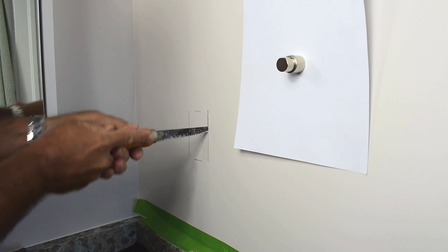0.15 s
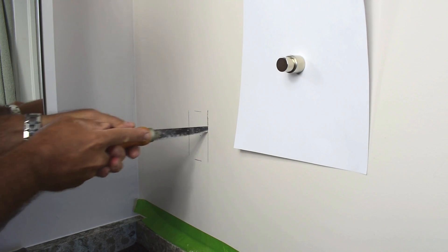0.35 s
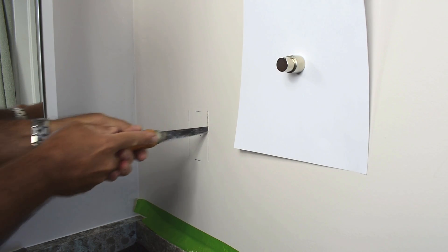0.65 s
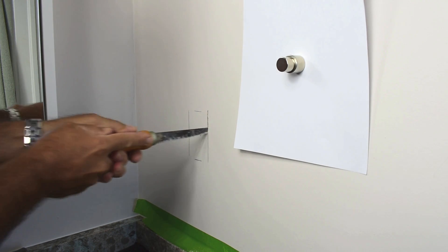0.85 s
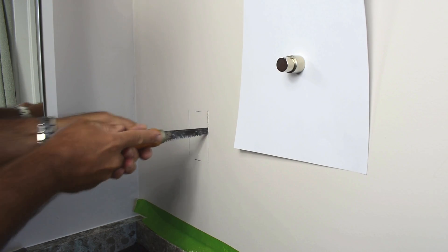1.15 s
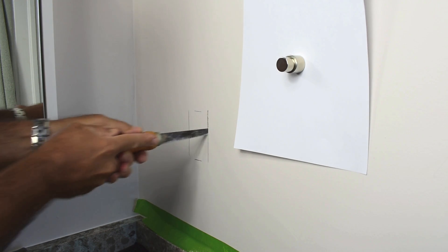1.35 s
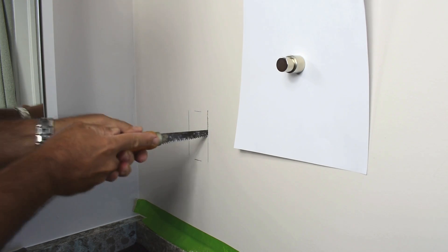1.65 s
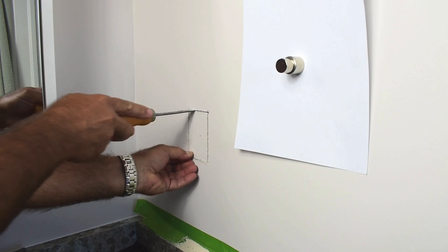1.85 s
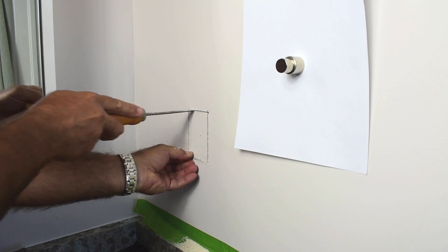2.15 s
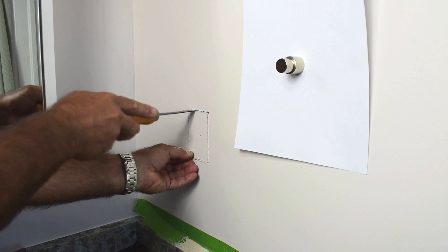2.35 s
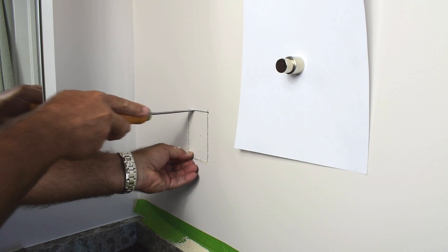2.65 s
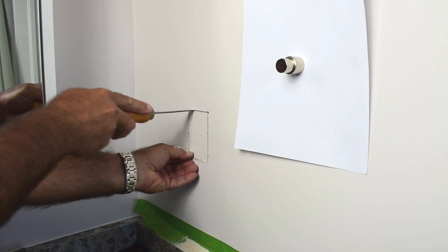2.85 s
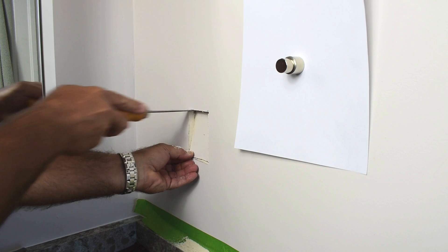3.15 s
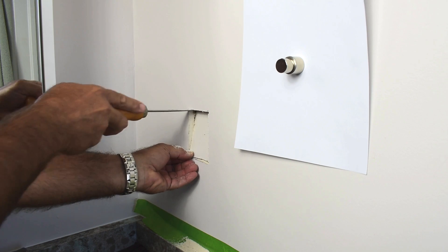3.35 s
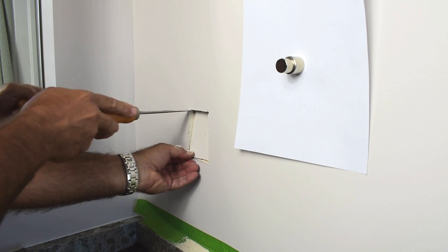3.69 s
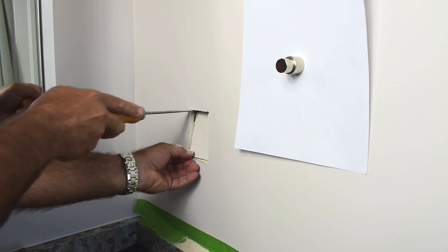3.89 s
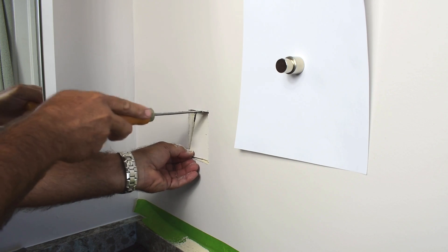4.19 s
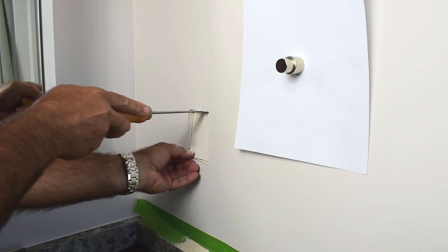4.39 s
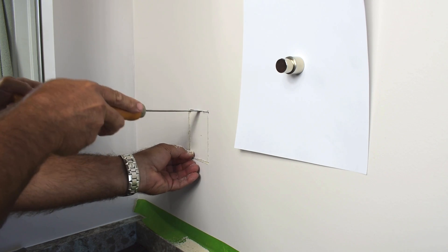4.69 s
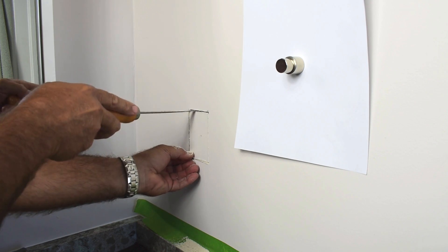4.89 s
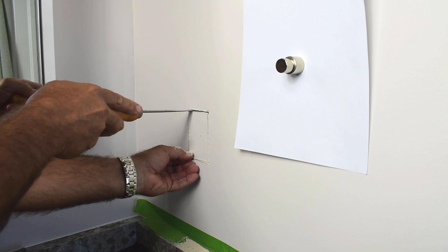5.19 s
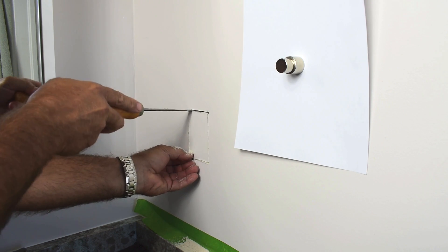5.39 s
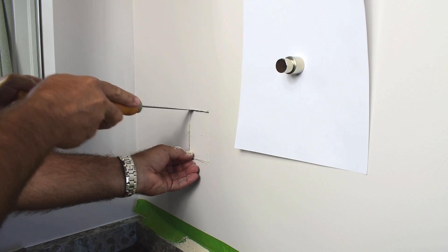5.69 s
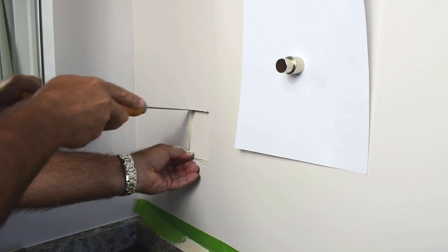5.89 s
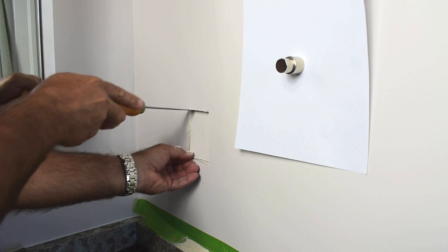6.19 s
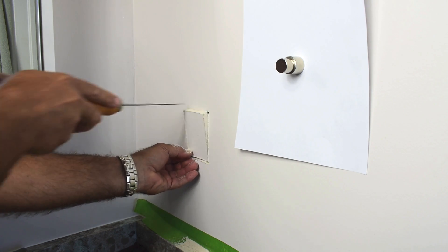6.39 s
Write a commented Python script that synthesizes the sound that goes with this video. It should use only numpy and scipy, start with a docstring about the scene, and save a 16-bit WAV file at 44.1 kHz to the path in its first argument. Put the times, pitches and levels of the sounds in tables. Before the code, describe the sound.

In a quiet room, quick, loud strokes of a hand saw tear through plasterboard close by. Each gritty rasp comes with a hollow thud from the wall, and the teeth snag now and then. After a few seconds the sawing eases, the blade squeaks once and a faint hum swells and fades. A few softer scraping strokes follow to the end.

```python
"""Sawing a hole in plasterboard

A hand saw cuts a small opening in a plasterboard wall, close by, about eight strokes a second.
Each tooth that bites thumps the hollow wall. Torn gypsum (the chalky filling) rasps and makes the
blade ring; now and then a tooth snags or grit snaps. After two hard cuts the strokes turn light,
the blade squeaks, and a low hum swells and fades in the quiet room."""
import sys
import numpy as np
from scipy import signal
from scipy.fft import rfft, irfft
from scipy.io import wavfile
from scipy.ndimage import uniform_filter1d

SR = 44100
rng = np.random.default_rng(int(sys.argv[2]) if len(sys.argv) > 2 else 0)


def master(y):
    """Save y as 16-bit WAV."""
    cut = np.clip(np.atleast_2d(y).T, -1, 1)
    pcm = np.round(cut * 32767)  # scale
    wavfile.write(sys.argv[1], SR, pcm.astype(np.int16))


N = 288414

# Levels in the tables are relative: the functions scale them further.
# Saw strokes: start t/s, length/s, attack/s, deepest bite after the start/s, thump after the start/s,
# rasp level/dB, boom level/dB, knock level/dB, extra dust hiss/dB
STROKES = [(0.0, 0.0096, 0.005, 0.0, 0.0079, -35.5, -6, -20, 5),
           (0.031, 0.053, 0.006, 0.027, 0.029, -28, -6, -15, 3.5),
           (0.141, 0.06, 0.042, 0.013, 0.033, -35, -5.5, -18.5, 2.5),
           (0.238, 0.041, 0.0083, 0, 0.0059, -36.5, -15, -20, 4.5),
           (0.364, 0.037, 0.0096, 0.0096, 0.027, -39, -25, -31, 4.5),
           (0.489, 0.079, 0.058, 0.047, 0.037, -41, -15, -24, 4.5),
           (0.592, 0.092, 0.021, 0.048, 0.045, -36.5, -18, -31, 8.5),
           (0.729, 0.071, 0.007, 0.032, 0.035, -27.5, -7.5, -12.5, 3),
           (0.849, 0.054, 0.055, 0.029, 0.04, -35.5, -9.5, -23.5, 2.5),
           (0.946, 0.016, 0.013, 0, 0.034, -37, -16.8, -21.5, 3.5),
           (0.998, 0.048, 0.005, 0.0067, 0.021, -33, -10.5, -22, 3),
           (1.082, 0.05, 0.05, 0.0047, 0.04, -38.5, -16, -30.5, 6),
           (1.19, 0.071, 0.015, 0.052, 0.046, -28, -6, -15, -0.5),
           (1.307, 0.077, 0.029, 0.04, 0.045, -33.0, -13, -25, 7),
           (1.437, 0.075, 0.042, 0.04, 0.024, -28.5, -8.5, -13.5, 3.0),
           (1.554, 0.05, 0.019, 0.0076, 0.009, -32.5, -7, -19.5, 5.5),
           (1.649, 0.01, 0.028, 0.0017, 0.0098, -37.5, -14, -19, 4),
           (1.691, 0.04, 0.004, 0.028, 0.018, -27, -8, -14, 6),
           (1.777, 0.039, 0.05, 0.016, 0, -35.5, -17.5, -23.5, 2),
           (1.864, 0.04, 0.0073, 0.014, 0.029, -33, -7, -16, 2.5),
           (1.98, 0.086, 0.005, 0.043, 0.066, -33, -11.5, -25, 5),
           (2.111, 0.038, 0.027, 0.028, 0.034, -36, -8, -14.5, 4),
           (2.247, 0.06, 0.009, 0.02, 0.047, -38.5, -20, -29.5, 4.5),
           (2.361, 0.081, 0.011, 0.058, 0.034, -26.5, -9.5, -14, 2.9),
           (2.496, 0.059, 0.028, 0.027, 0.024, -30.5, -11.5, -23.5, 4),
           (2.602, 0.093, 0.011, 0.05, 0.042, -25.9, -5.5, -10.5, 1),
           (2.746, 0.074, 0.047, 0.026, 0.031, -31, -13.5, -18.5, 5),
           (2.869, 0.067, 0.014, 0.028, 0.041, -24.5, -8, -16.3, 2),
           (2.971, 0.1, 0.05, 0.05, 0.015, -32.5, -22.5, -24, 4.5),
           (3.12, 0.048, 0.0073, 0.024, 0.034, -26, -6, -11.5, 3.5),
           (3.239, 0.057, 0.0054, 0.013, 0.065, -28.5, -13.5, -22, 6),
           (3.343, 0.081, 0.039, 0.035, 0.068, -34.5, -15.6, -28, 0.5),
           (3.495, 0.066, 0.046, 0.018, 0.018, -42.5, -31.7, -42, 8.5),
           (3.594, 0.06, 0.038, 0.053, 0.056, -39, -34, -40.5, 3.5),
           (3.699, 0.076, 0.018, 0.0073, 0.029, -38.5, -30.5, -39, 5.5),
           (3.814, 0.037, 0.013, 0.013, 0.025, -39.5, -46, -41, 1.9),
           (3.878, 0.04, 0.05, 0.0059, 0.019, -39.5, -37.5, -44, 4.5),
           (3.957, 0.047, 0.02, 0, 0.056, -40, -40.5, -47, 6),
           (4.176, 0.079, 0.019, 0.045, 0.024, -49, -41.5, -54, 7),
           (4.3, 0.047, 0.004, 0.015, 0.017, -42, -32.5, -44.5, 2.5),
           (4.43, 0.048, 0.03, 0.026, 0.0, -41.5, -37.5, -47, 1),
           (4.547, 0.15, 0.05, 0.058, 0.05, -50.5, -38, -46.7, 7.6),
           (4.755, 0.063, 0.044, 0.037, 0.036, -55.5, -44, -54, 9),
           (4.874, 0.025, 0.026, 0.0047, 0.04, -58.5, -52.4, -55, 5),
           (5.024, 0.026, 0.0061, 0, 0.042, -55.5, -62, -61, 12),
           (5.228, 0.023, 0.0071, 0, 0.048, -55, -32.5, -52, 2),
           (5.27, 0.092, 0.0045, 0.011, 0, -42, -31, -42, 11),
           (5.383, 0.046, 0.024, 0.014, 0.023, -40.5, -38, -41.5, 3),
           (5.484, 0.022, 0.011, 0, 0.033, -39, -25, -38.5, 4.7),
           (5.608, 0.033, 0.0038, 0.026, 0.0056, -37.5, -37, -37.5, 3.5),
           (5.697, 0.023, 0.05, 0, 0.002, -43.6, -32.5, -40.5, 7),
           (5.821, 0.028, 0.008, 0.0021, 0.008, -42, -37, -43, 5.5),
           (5.891, 0.11, 0.038, 0.046, 0.036, -37, -24.5, -29.5, 5),
           (6.055, 0.029, 0.0075, 0.011, 0.001, -36.5, -29.1, -39, 5.5),
           (6.133, 0.054, 0.044, 0.037, 0.041, -39.5, -26, -35, 7),
           (6.289, 0.1, 0.043, 0.024, 0.0079, -37, -28.5, -37.5, 11)]
# A tooth snags and jolts the wall: t/s, level/dB
SNAGS = [(0.043, -14), (0.15, -7), (0.749, -7), (0.863, -0.5), (1.004, -3), (1.11, -12), (1.216, 3.5),
         (1.339, 2), (1.444, 2.5), (1.552, -5.5), (1.694, -1.5), (1.874, 3), (2.127, 4.5), (2.618, 5),
         (2.875, 1.5), (3.144, -6), (3.405, -16.5), (5.502, -14), (5.899, -16), (5.944, -7.5)]
# Grit snaps under the blade: t/s, level/dB, f/Hz
SNAPS = [(0.0336, -19.5, 1580), (0.2375, -27, 1170), (0.7327, -38, 1170), (1.0025, -22, 1050),
         (1.6918, -20, 1170), (1.8584, -24, 1270), (2.6452, -13.5, 1030), (2.8757, -20.5, 1200),
         (3.247, -15, 1550), (4.303, -31, 2800), (5.951, -24, 1240), (6.0584, -28.5, 1590)]
# The blade squeaks in the slot: t/s, length/s, start f/Hz, end f/Hz, level/dB
SQUEAKS = [(3.59, 0.096, 880, 950, -32.5), (3.595, 0.14, 377, 417, -37)]
# Modes (tones a thing rings at) of the wall, low boom and higher knock: f/Hz, width/Hz, level/dB
BOOM_MODES = [(116.4, 16.2, -2.5), (144, 19.8, 0), (165.6, 36, -7.5)]
KNOCK_MODES = [(202.5, 22.5, 0.5), (267.2, 21.1, -2.5), (300.8, 15.7, -2), (395.4, 32.7, -12.5),
               (446, 5.8, -10), (550, 25, -15), (655, 49, -27.5)]
# Tone colour of the rasp in the upright cut, the level cut and the light strokes: f/Hz, level/dB
RASP_UPRIGHT = [(380, -29), (650, 4), (944, -6), (1180, -4), (1460, -7), (1610, -14), (2100, -5.5),
                (3350, -9), (9710, -25), (15700, -39)]
RASP_LEVEL = [(380, 3), (650, 0), (773, -5.5), (1270, -10.5), (2160, -10), (2890, -4), (4250, -14.5),
              (8280, -21), (15700, -37)]
RASP_LIGHT = [(380, 1), (650, -6), (704, -16.5), (895, -2.5), (982, -6), (1610, -13.5), (2160, -9.5),
              (2810, -8), (15700, -35.5)]
# Modes of the blade in the same three stages: f/Hz, width/Hz, level/dB
BLADE_UPRIGHT = [(1170, 34, 10.5), (1628, 50, 17.5), (1860, 72, 6), (2790, 250, 3), (3270, 66, 8),
                 (3960, 220, 5)]
BLADE_LEVEL = [(849.6, 10, 12.3), (1030, 30, 8.8), (1196, 194, 11.6), (1680, 17, 1), (2800, 65, 6.6),
               (3130, 55, 7.8), (3790, 100, 9.2)]
BLADE_LIGHT = [(1310, 91, 2.8), (1630, 206, 4.8), (2910, 194, 7.5), (3120, 42, 2.5), (3860, 140, 4.4)]
# Pitch and strength of the low hum: t/s, f/Hz, level/dB
HUM = [(3.4, 68.4, -45), (3.516, 70.53, -40.5), (4.238, 65.7, -34.5), (4.486, 64.3, -48.5), (4.6, 66, -53)]
# How much scattered sound sets left and right apart: f/Hz, level/dB
STEREO_WIDTH = [(60, -28), (180, -31), (550, -33), (1650, -18.5), (4970, -9.5), (15000, -16)]
# Tone colour of the quiet room: f/Hz, level/dB
ROOM_TONE = [(15, -42), (25, -1.5), (75, -4), (189, -17.5), (222, -8), (324, -26), (901, -29.5),
             (15700, -53.5)]
# How a stroke shapes each layer: added attack/s, place of the peak (0 = bite, 1 = thump),
# climb/(dB/s), sag/(dB/s), release/(dB/s)
RASP_SHAPE = (0.0, 0.0, 119, 86, 245)
BOOM_SHAPE = (0.024, 0.96, 334, 205, 135)
KNOCK_SHAPE = (0.018, 0.31, 302, 120, 145)

TEETH_PER_S, TOOTH_JITTER, TOOTH_SPREAD_DB = 145, 0.2, 3.5
CRUMBS_PER_S, GRAINS_PER_S = 500, 5000
LEVEL_CUT_START_S, LIGHT_START_S = 1.95, 3.47


def wall_thumps():
    """Nearly regular tooth bites make the wall boom; with uneven crumbling they also make it knock."""
    boom_db, knock_db = np.transpose(STROKES)[6:8]
    teeth_passed = np.floor(np.cumsum(TEETH_PER_S * (1 + TOOTH_JITTER * drift(30)) / SR))
    bites = np.diff(teeth_passed, prepend=0) * from_db(TOOTH_SPREAD_DB * rng.standard_normal(N))
    crumbs = (rng.random(N) < CRUMBS_PER_S / SR) * rng.standard_normal(N)
    boom = rms_one(resonate(ring(bites, BOOM_MODES), hz=136, width=212))
    knock = rms_one(ring(0.39 * rms_one(bites) + rms_one(crumbs), KNOCK_MODES))
    return stroke_gain(boom_db, BOOM_SHAPE) * boom + stroke_gain(knock_db, KNOCK_SHAPE) * knock


def tooth_snags():
    """A tooth catches and jolts the wall; gypsum gives way, so the push is blunt."""
    soften = signal.butter(2, 450, fs=SR, output="sos")
    jolts = signal.sosfilt(soften, clicks(SNAGS))
    return from_db(41.5) * (ring(jolts, BOOM_MODES) + from_db(-7) * ring(jolts, KNOCK_MODES))


def gypsum_rasp():
    """Gypsum tears in tiny grains; the slot colours their sound and the blade rings along."""
    sizes = from_db(-0.5 * np.minimum(rng.exponential(1, N), 5)) * rng.choice([-1, 1], N)
    grains = rms_one(sizes * (rng.random(N) < GRAINS_PER_S / SR) * from_db(1.68 * drift(46)))
    snaps = clicks(np.array(SNAPS)[:, :2])
    crunch = signal.lfilter([1], [1, -np.exp(-1 / (0.008 * SR))], snaps)   # a snap crumbles on briefly
    force = (stroke_gain(np.transpose(STROKES)[5], RASP_SHAPE) + from_db(-18) * crunch) * grains
    stage = np.searchsorted([LEVEL_CUT_START_S, LIGHT_START_S], np.arange(N) / SR)
    cuts = (RASP_UPRIGHT, BLADE_UPRIGHT), (RASP_LEVEL, BLADE_LEVEL), (RASP_LIGHT, BLADE_LIGHT)
    grip = drift(3.3)
    rasp = 0
    for k, (spectrum, modes) in enumerate(cuts):
        cut_force = (stage == k) * force
        ringing = blade_ring(coloured(cut_force, spectrum), modes, grip)
        rasp = rasp + ringing * from_db(-1) * np.std(cut_force) / np.std(ringing)
    return rasp + dust_hiss(rasp) + grit_snaps()


def blade_ring(rasp, modes, grip):
    """Add the blade's ring. The slot grips it at changing spots, so each mode swells and wanders."""
    out = rasp
    for hz, width, db in modes:
        for detune in 0.965, 1.011:   # two close pitches, each swelling on its own
            own_grip = np.roll(grip, rng.integers(N))
            out = out + from_db(db - 9 + 5.75 * own_grip) * resonate(rasp, hz * detune, width)
    return out


def dust_hiss(rasp):
    """Dust adds flickering treble to the rasp, by a different amount in each stroke."""
    start, length, *_, hiss_db = np.transpose(STROKES)
    boost_db, = in_time(np.transpose([start + length / 2, hiss_db]))
    treble = signal.sosfilt(signal.butter(2, 5500, "high", fs=SR, output="sos"), rasp)
    return (from_db(boost_db + 2 * drift(11)) - 1) * treble


def grit_snaps():
    """Grit cracks under the blade; each chip rings at a pitch set by its size."""
    cracks = 0
    for start, db, hz in SNAPS:
        chip = resonate(clicks([(start, db)]), hz, width=270)
        cracks = cracks + resonate(chip, hz, width=1100)
    return from_db(30.5) * cracks


def blade_squeaks():
    """The blade sticks and slips, making rough tones that start fast, rise and linger."""
    t, out = np.arange(N) / SR, 0
    for start, length, start_hz, end_hz, db in SQUEAKS:
        progress = np.clip((t - start) / length, 0, 1)
        swell = 5.6 * progress * (1 - progress) ** 2 * from_db(3.4 * drift(57) - 6.6 * progress)
        hz = (start_hz + (end_hz - start_hz) * progress) * (1 + 0.0123 * drift(64))
        out = out + from_db(db) * swell * np.sin(2 * np.pi * np.cumsum(hz) / SR)
    return out


def wall_sway():
    """The wall's lowest, slowest modes rumble, following the average strength of the boom."""
    sway = ring(rng.standard_normal(N), [(25.4, 10.4, -1), (39.5, 14, -6), (70.4, 40, -8)])
    boom_gain = stroke_gain(np.transpose(STROKES)[6], BOOM_SHAPE)
    average = uniform_filter1d(boom_gain, round(0.33 * SR))
    return from_db(-14.5) * np.abs(average) ** 0.78 * rms_one(resonate(sway, hz=33, width=104))


def low_hum():
    """One deep tone swells and fades, its pitch shifting a little."""
    fade_in = (HUM[0][0] - 0.2, HUM[0][1], -90)
    fade_out = (HUM[-1][0] + 0.2, HUM[-1][1], -90)
    hz, db = in_time([fade_in, *HUM, fade_out])
    return np.sqrt(2) * from_db(db) * np.sin(2 * np.pi * np.cumsum(hz) / SR)


def echoes(x, fade_s):
    """Many small echoes smear x into a tail that drops 60 dB in fade_s."""
    t = np.arange(int(fade_s * SR)) / SR
    tail = rng.standard_normal(len(t)) * from_db(-60 * t / fade_s)
    return signal.fftconvolve(x, tail / np.sqrt(np.sum(tail ** 2)))[:N]


def room_tone():
    """The faint, steady rumble of the room, as two separate noises."""
    return from_db(-48.5) * rms_one(coloured(rng.standard_normal((2, N)), ROOM_TONE))


def stroke_gain(levels_db, shape):
    """Loudness over time: each stroke sets in, climbs to a peak, sags and lets go."""
    added_attack, peak_place, climb, sag, release = shape
    t, power = np.arange(0, N + 32, 32) / SR, 1e-12
    for (start, length, attack, bite, thump), db in zip(np.array(STROKES)[:, :5], levels_db):
        age = t - start
        peak = bite + peak_place * (thump - bite)
        loss_db = 20 * np.maximum(-age, 0) / (attack + added_attack)   # fades in just before the start
        loss_db += climb * np.clip(peak - age, 0, peak)
        loss_db += sag * np.maximum(age - peak, 0)
        loss_db += release * np.maximum(age - max(length, peak), 0)
        power = power + from_db(db - loss_db) ** 2
    return np.interp(np.arange(N) / SR, t, np.sqrt(power))


def resonate(x, hz, width):
    """Let x ring at one pitch; a smaller width (in Hz) rings longer."""
    r = np.exp(-np.pi * width / SR)
    b = (1 - r * r) / 2 * np.array([1, 0, -1])
    return signal.lfilter(b, [1, -2 * r * np.cos(2 * np.pi * hz / SR), r * r], x + 1e-18)


def ring(x, modes):
    """Let x ring in several modes at once, with every second one flipped in sign."""
    return sum((-1) ** k * from_db(db) * resonate(x, hz, width)
               for k, (hz, width, db) in enumerate(modes))


def clicks(events):
    """One click for each row of t/s, level/dB."""
    out = np.full(N, 1e-18)   # not quite zero, which keeps filters fast
    for start, db in events:
        out[round(start * SR)] = from_db(db)
    return out


def drift(rate_hz):
    """A smooth random wobble, about 1 in size."""
    r = np.exp(-2 * np.pi * rate_hz / SR)
    return rms_one(signal.lfilter([1], [1, -2 * r, r * r], rng.standard_normal(N + SR))[SR:])


def coloured(x, spectrum):
    """Shape the bass and treble of x by rows of f/Hz, level/dB."""
    hz, db = np.transpose(spectrum)
    grid = np.maximum(np.fft.rfftfreq(N, 1 / SR), 1)
    return irfft(rfft(x) * from_db(np.interp(np.log(grid), np.log(hz), db)), N)


def in_time(rows):
    """Join rows that begin with t/s into one curve for each other column."""
    times, *columns = np.transpose(rows)
    return [np.interp(np.arange(N) / SR, times, column) for column in columns]


def from_db(db):
    """Turn decibels into a factor to multiply by."""
    return 10 ** (np.asarray(db) / 20)


def rms_one(x):
    """Scale x to an average strength (rms) of 1."""
    return x / np.sqrt(np.mean(x ** 2) + 1e-20)


def scene():
    """Saw and wall in front; scattered sound sets left and right apart, most of all in the treble."""
    low = wall_thumps() + tooth_snags() + wall_sway() + low_hum()
    blade = gypsum_rasp() + blade_squeaks()
    room_mid, room_side = room_tone()
    absorb = signal.butter(1, 4000, fs=SR, output="sos")   # walls and furniture soak up the treble
    blade_echoes = signal.sosfilt(absorb, echoes(blade, fade_s=0.15))
    mid = low + blade + from_db(-0.5) * blade_echoes + room_mid
    scattered = echoes(low, fade_s=0.027) + echoes(gypsum_rasp(), fade_s=0.092) + room_side
    side = coloured(scattered, STEREO_WIDTH)
    return np.array([(mid + side) * from_db(0.1), (mid - side) * from_db(-0.1)])


def record(dry):
    """Round off the loudest peaks and cut the highest treble."""
    rounded = 1.3 * np.tanh(dry / 1.3)
    return signal.sosfilt(signal.ellip(12, 0.5, 70, 15830, fs=SR, output="sos"), rounded)


dry = scene()
out = record(dry)
master(out)
```